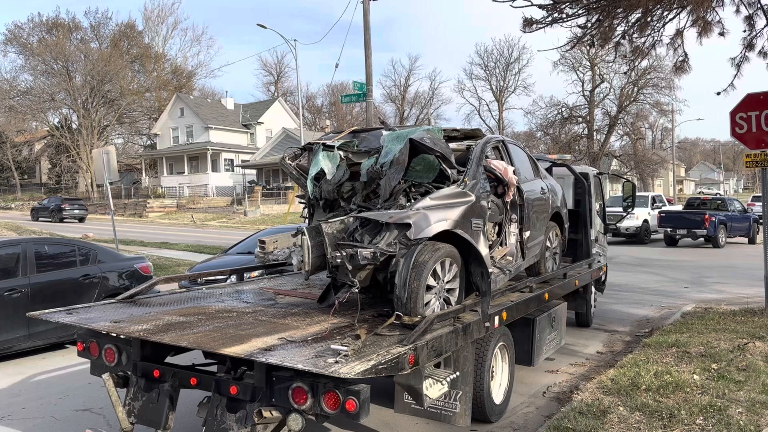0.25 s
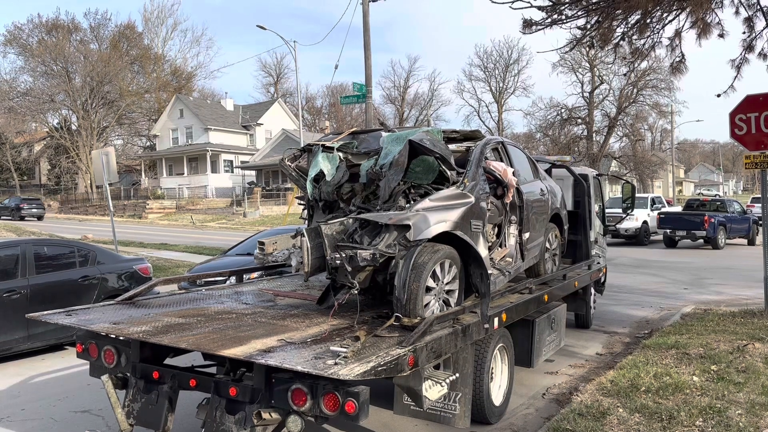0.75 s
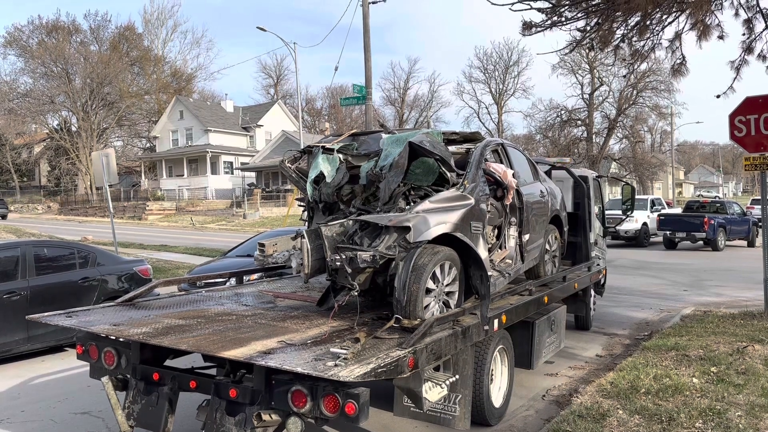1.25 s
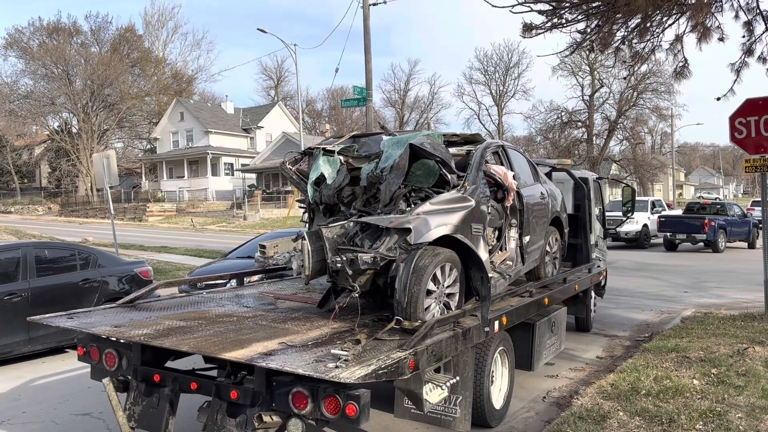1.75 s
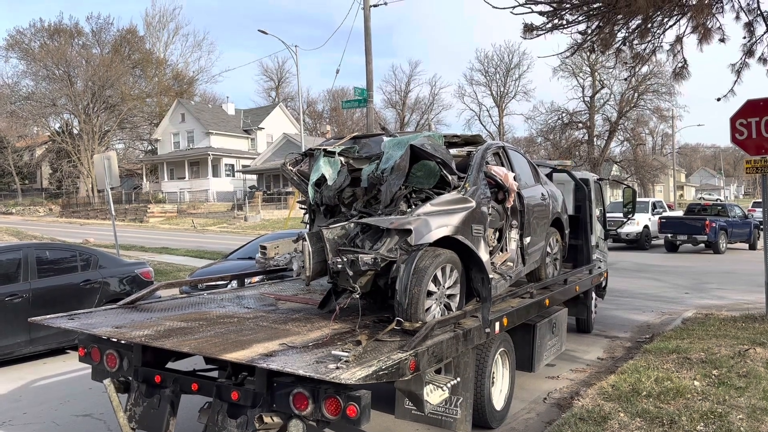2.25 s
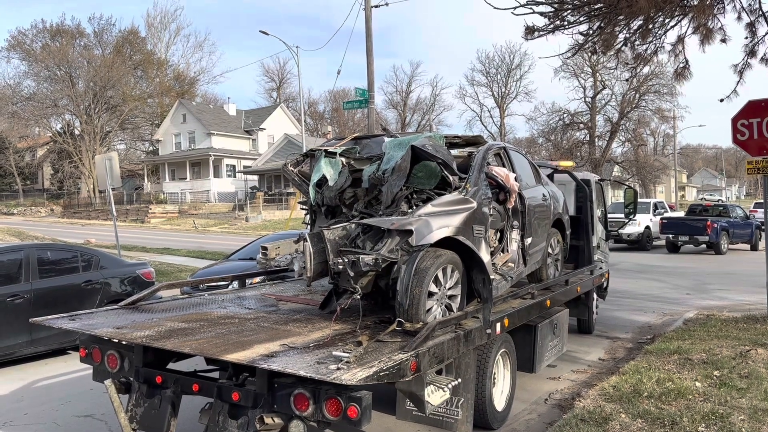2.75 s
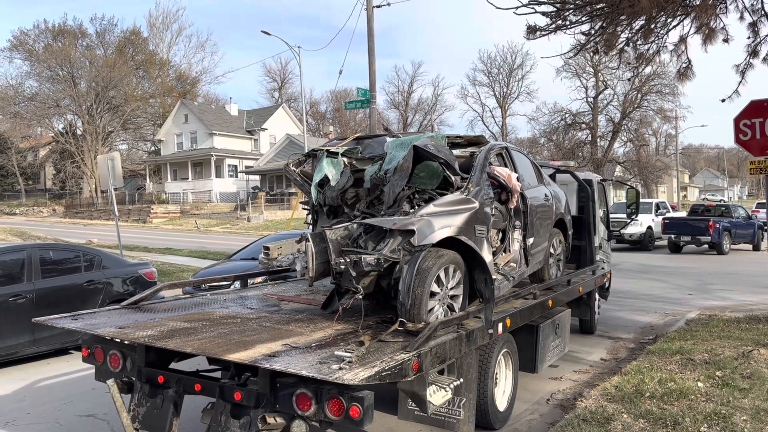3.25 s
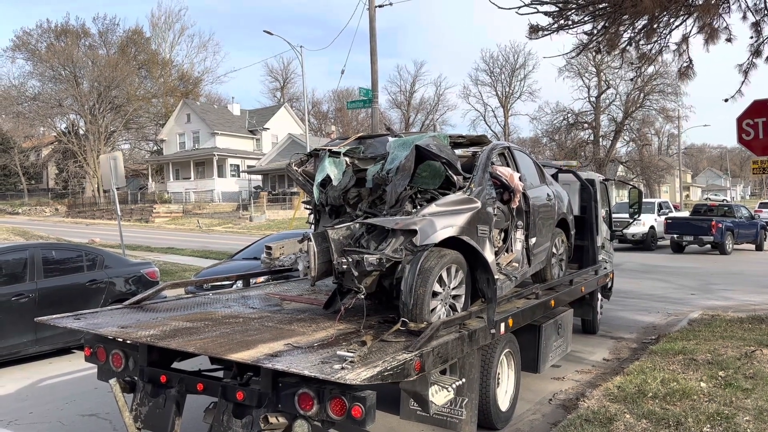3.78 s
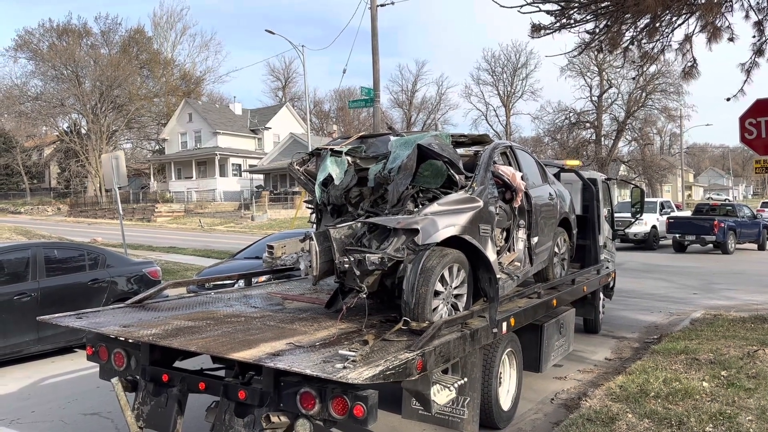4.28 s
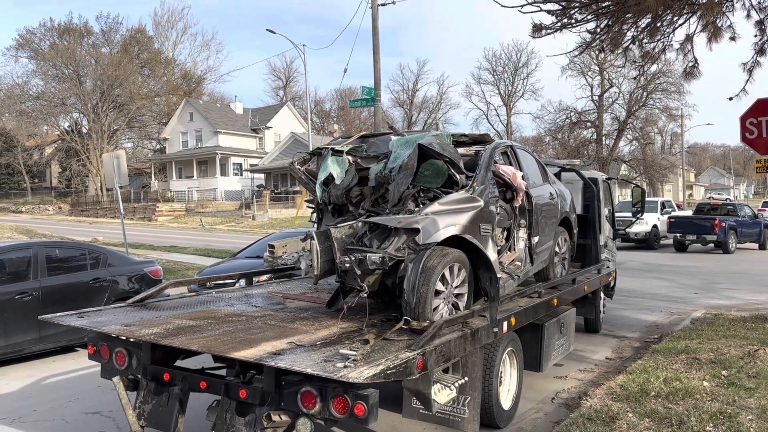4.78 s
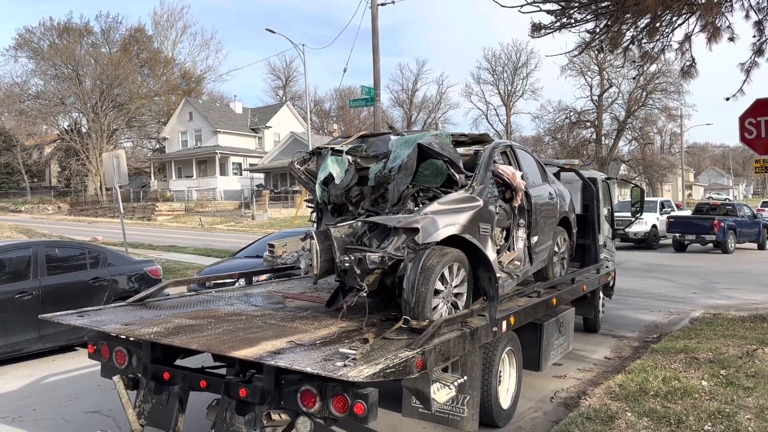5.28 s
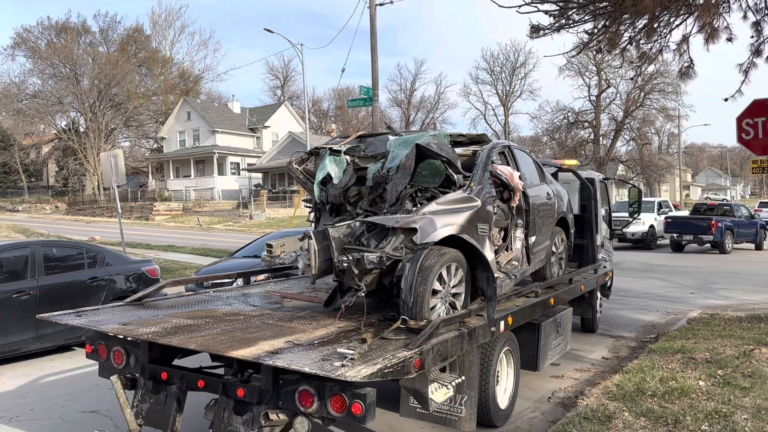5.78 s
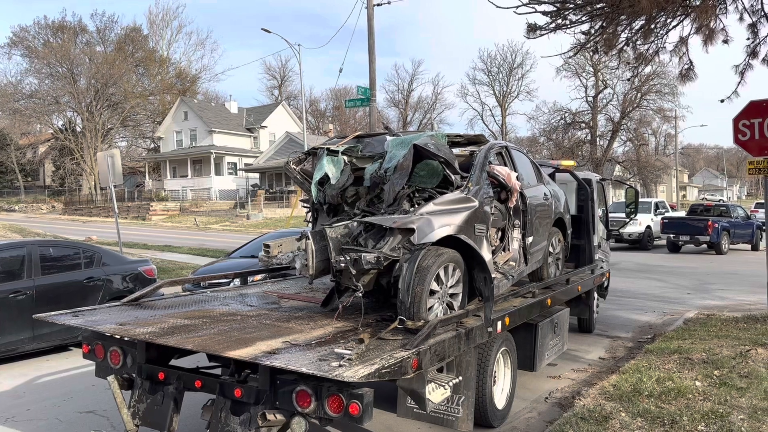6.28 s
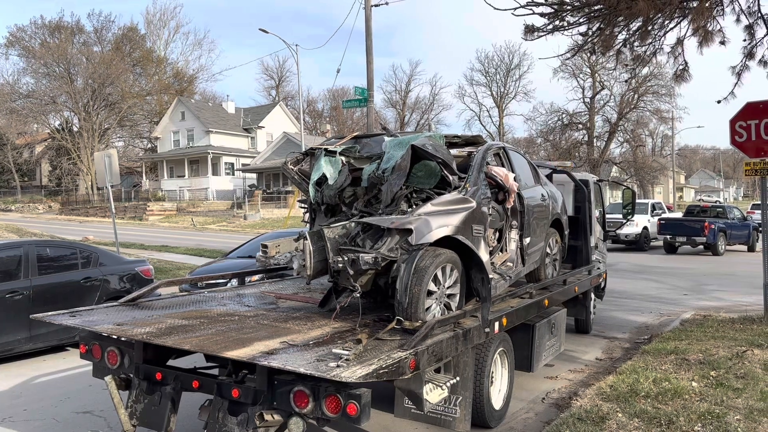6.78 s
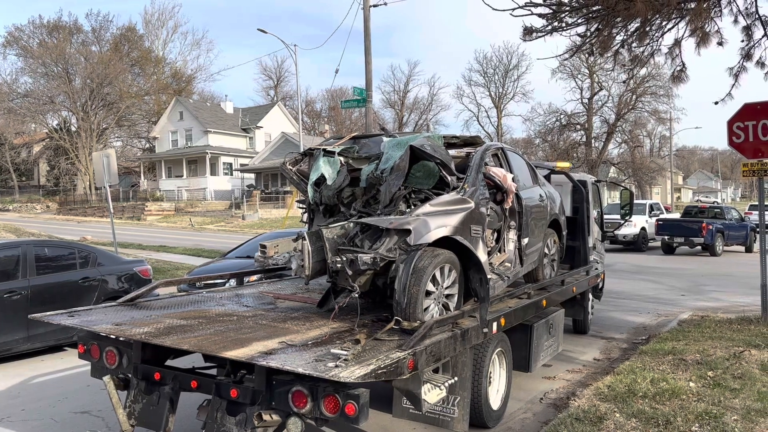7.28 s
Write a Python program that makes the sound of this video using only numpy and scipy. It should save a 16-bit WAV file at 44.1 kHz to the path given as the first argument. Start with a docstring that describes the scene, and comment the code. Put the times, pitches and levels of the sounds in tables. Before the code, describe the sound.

A diesel engine chatters evenly at fast idle, one beat in its cycle stronger, beneath a hydraulic pump's drone and whirring, hissing accessories. The stereo outdoor microphone catches strong wind: irregular low thuds, short flapping snaps and rumbling bursts, heaviest from about one and a half to five seconds, then sparser with a last strong burst after seven.

```python
"""Diesel engine and pump in gusty wind

An eight-cylinder diesel at a fast idle across the street knocks in a fixed pattern: clicks set its block ringing.
It turns a hydraulic pump; sine tones make the pump's hum and the exhaust beat.
A belt-driven accessory whirs with partly repeating noise and thin tones, and the fan is a flickering hiss.
Wind rumbles as shaped noise and thumps the microphone with short sliding swings.
A metal tick and two faint high chips are also heard."""
import sys
import numpy as np
from scipy import signal
from scipy.fft import rfft, irfft, next_fast_len
from scipy.io import wavfile

SR = 44100
rng = np.random.default_rng(int(sys.argv[2]) if len(sys.argv) > 2 else 0)


def inscribe(sig):
    """Save sig as 16-bit PCM at rate SR to the path in sys.argv[1].

    A 1-D sig is mono; a 2-D sig holds one channel per row.
    Samples are clipped to [-1, 1] before scaling.
    """
    pcm = np.round(np.clip(np.atleast_2d(sig).T, -1, 1) * 32767)
    wavfile.write(sys.argv[1], SR, pcm.astype(np.int16))


N = 332066
CYCLE_HZ = 10.826   # full engine cycles per second; each cylinder fires once a cycle

# how alike the left and right hiss are: pitch_hz, likeness (0 to 1)
LIKENESS = [(60, 1), (500, 0.7), (860, .55), (1200, 0.28), (1550, 0.25), (1900, .75), (2500, 0.34),
            (3000, 0.49), (3400, .2), (4300, .68), (5300, 0.18), (6800, .4), (7500, .2), (8600, 1),
            (10000, 0.23), (13000, .6), (13700, 1)]
# which side the machine sounds lean to: pitch_hz, left_minus_right_db
LEAN = [(60, 0.5), (700, 1.5), (900, -2), (1250, -2), (1550, -10), (1900, 1), (2600, 3), (3300, 8),
        (3900, -4.5), (4600, 2.5), (8000, -0.1)]
# how far the right side of the hiss is shifted ahead: pitch_hz, phase_radians
RIGHT_LEAD = [(700, 0), (950, -0.8), (1150, 1.7), (1460, 1.57), (1800, -0.24), (2400, -0.4), (2900, -1.3),
              (3350, -1.9), (3700, 1.2), (4100, -0.1), (5300, -.5), (5900, -1.5), (7400, -2.5), (8400, 1.5),
              (9000, 1.9), (10000, 0), (12000, -9.5), (13600, -2.5)]


def from_db(db):
    """Turns decibels into a plain gain."""
    return 10 ** (np.asarray(db) / 20)


def rms_one(x):
    """Scales a sound to an rms of 1."""
    return x / np.sqrt(np.mean(x ** 2) + 1e-20)


def in_time(rows):
    """Draws straight lines between timed rows, giving each column a value at every sample."""
    s, *columns = np.transpose(rows)
    return [np.interp(np.arange(N) / SR, s, c) for c in columns]


def at_hz(points, hz):
    """Reads a curve at any pitch, with pitch on a log axis."""
    points = np.array(points, float)
    return np.interp(np.log(hz), np.log(points[:, 0] + 1), points[:, 1])


def drift(rate):
    """Smoothed noise that wanders slowly around 0 with spread 1; a higher rate wanders faster."""
    r = np.exp(-80 * np.pi * rate / SR)   # one value every 40 samples
    steps = rng.standard_normal(N // 40 + 2002)
    slow = signal.lfilter([1], [1, -2 * r, r * r], steps)[2000:]   # drop the settling-in
    return np.interp(np.arange(N) / 40, np.arange(len(slow)), rms_one(slow))


def ring(clicks, hz, t60):
    """A resonator: each unit click starts a sine that dies away by 60 dB in t60 seconds."""
    r, w = from_db(-60 / (t60 * SR)), 2 * np.pi * hz / SR
    return signal.lfilter([0, np.sin(w)], [1, -2 * r * np.cos(w), r * r], clicks + 1e-18)


def panned(x, pan_db):
    """Makes two channels, the left louder than the right by pan_db."""
    return np.array([x * from_db(pan_db / 2), x * from_db(-pan_db / 2)])


def stereo_noise(spectrum, likeness, lean, loop_hz=1, memory=0, lead=((1, 0), (2, 0))):
    """Noise of rms 1 shaped by the curves; with memory it partly repeats itself loop_hz times a second."""
    size = next_fast_len(N)
    hz = np.arange(size // 2 + 1) * SR / size + 1
    mid, side = rfft(rng.standard_normal((2, size)))
    alike = np.clip(at_hz(likeness, hz), 0, .98)
    # the shared part is the same on both sides, the other part has opposite signs
    pair = np.sqrt(1 + alike) * mid + np.sqrt(1 - alike) * side * [[1], [-1]]
    pair[1] *= np.exp(1j * at_hz(lead, hz))
    pair /= 1 - min(memory, .95) * np.exp(-2j * np.pi * hz / loop_hz)   # each turn keeps a share of the last
    colour = panned(from_db(at_hz(spectrum, hz)), at_hz(lean, hz))
    return rms_one(irfft(pair * colour, size)[:, :N])


def add_swing(out, s, level_db, hz, pan_db, rise, fall, glide, hold_s=0):
    """Adds a pressure swing that swells to a crest at s and fades, sliding down in pitch through hz at the crest."""
    hold = hold_s * hz   # rise, hold and fall all count in cycles of hz
    lead_in = int(3 * rise * SR / hz)
    cycles = np.arange(-lead_in, int((hold + 6 * fall) * SR / hz)) * hz / SR
    swell = np.exp(-(cycles / rise) ** 2)
    fade = np.exp(-np.maximum(cycles - hold, 0) / fall)
    shape = np.where(cycles < 0, swell, fade)
    pitch_ratio = np.where(cycles < 0, 1 - glide * cycles, 1 / (1 + glide * np.abs(cycles)))
    turns = np.cumsum(pitch_ratio) * hz / SR
    start = round(s * SR) - lead_in
    wave = from_db(level_db) * shape * np.sin(2 * np.pi * (turns + rng.random()))
    out[:, start:start + len(cycles)] += panned(wave, pan_db)


def knock(wander_s, scatter_db):
    """Each firing clicks every mode of the block; one cylinder is louder and makes a soft chug. Timing wanders."""
    # knock of each cylinder in firing order: left_db, right_db (full strength only at the chug pitch)
    cylinder_levels = [(-3, -7), (-7, -3), (-5, -6), (3, 3.5), (-6, -7), (-3, -4), (-8, -8), (-4, -4)]
    # ringing modes of the engine block: pitch_hz, t60_s, left_db, right_db, right_lag_s (before random spread)
    block_modes = [(744.4, 0.11, -40, -39, 0), (780, 0.071, -48.5, -49.5, 0), (868, 0.15, -40, -41, 0),
                   (894, 0.14, -43.5, -43, 0), (951, 0.069, -43, -48.5, 0), (989, .13, -38.5, -40, 0.0046),
                   (1004, 0.069, -40, -41, -.00005), (1118, 0.12, -43.5, -39.5, -0.000041),
                   (1140, 0.073, -45.5, -38, -0.00058), (1210, 0.13, -42.5, -42, -.00017),
                   (1300, 0.073, -45, -42.5, -.00018), (1440, 0.057, -44.5, -44.5, -.00018),
                   (1510, 0.044, -45, -43.5, 0.0076), (1558, .06, -48.5, -42, -.00012),
                   (1600, 0.076, -49, -48, -.00007), (1880, 0.082, -46, -46.5, .00001),
                   (2273, 0.035, -48.5, -47.5, .00004), (2400, 0.027, -46, -51, .00003),
                   (2540, .025, -48.5, -51.5, -0.0069)]
    chug_hz, chug_octaves = 1050, .6   # the cylinders differ most around this pitch
    ear_path_spread_s = 0.00011   # each cylinder reaches the two sides by slightly different paths

    firing = np.arange(int((N / SR - .01) * 8 * CYCLE_HZ))
    at = np.round(firing / (8 * CYCLE_HZ) * SR).astype(int)
    at = at + np.round(wander_s * SR * drift(1.5)[at]).astype(int)
    cylinder = firing % 8
    out = np.zeros((2, N))
    for hz, t60, left_db, right_db, lag_s in block_modes:
        contrast = np.exp(-(np.log2(hz / chug_hz) / chug_octaves) ** 2)
        level_db = contrast * np.array(cylinder_levels)[cylinder] + [left_db, right_db]
        level_db = level_db + rng.normal(0, scatter_db, (len(at), 1))
        left, right = from_db(level_db).T
        # paths through block and bodywork differ in length, which smears each knock
        left_at = at + (rng.uniform(-.0008, .0012, 8) * SR).astype(int)[cylinder]
        lag_s = lag_s + rng.normal(0, ear_path_spread_s, 8)[cylinder]
        right_at = left_at + np.round(lag_s * SR).astype(int)
        clicks = np.zeros((2, N))
        clicks[0, np.clip(left_at, 0, N - 1)] = left
        clicks[1, np.clip(right_at, 0, N - 1)] = right
        out += ring(clicks, hz, t60)
    # the block radiates no bass and little treble
    return signal.sosfilt(signal.butter(2, [680, 3000], "band", fs=SR, output="sos"), out)


def hums():
    """The pump teeth and the exhaust beat each make a row of sines at whole multiples of their rate."""
    # pump tones: multiple of the tooth rate, relative_db
    pump_tones = [(1, -5.5), (2, -1), (3, -20.5)]
    # exhaust tones: multiple of the cycle rate, relative_db
    exhaust_tones = [(4, -3), (8, -9), (12, -13), (16, -14.5), (24, -14.5), (28, -9)]
    # pump loudness before its slow waver: time_s, level_db
    pump_level = [(0, -33.5), (1.75, -32), (2.0, -38.5), (3.2, -39), (3.8, -33), (4.4, -36.5), (5.2, -34.5),
                  (7.53, -34.5)]
    # loudness of the lower exhaust tones: time_s, level_db
    throb_level = [(0, -31), (1.9, -34), (2.5, -43), (4.2, -47), (5.0, -50), (7.53, -51)]
    tooth_hz, pump_waver_db = 292.7, 0.96
    side_waver_db = 1.0   # all pump tones but the second also swell and fade on their own
    buzz_from, buzz_db = 20, -37   # exhaust multiples from this one up hold a steady level

    (pump_db,), (throb_db,) = in_time(pump_level), in_time(throb_level)
    teeth, cycle = 2 * np.pi * np.outer([tooth_hz, CYCLE_HZ], np.arange(N) / SR)
    teeth = teeth + .08 * drift(2.5)   # the pump's pitch is slightly unsteady
    pump, throb = np.zeros(N), np.zeros(N)
    for k, db in pump_tones:
        tone_db = db + (k != 2) * side_waver_db * drift(3.4)
        pump += from_db(tone_db) * np.sin(k * teeth + rng.uniform(0, 2 * np.pi))
    for k, db in exhaust_tones:
        tone_db = db + (throb_db if k < buzz_from else buzz_db)
        throb += from_db(tone_db) * np.sin(k * cycle + rng.uniform(0, 2 * np.pi))
    pump_db = pump_db + pump_waver_db * drift(4.1)
    return np.sqrt(2) * (panned(from_db(pump_db) * pump, -1.5) + panned(throb, .3))


def accessory():
    """A belt-driven unit: a rush that partly repeats every turn, and thin tones that swell and fade."""
    # colour of the rush: pitch_hz, relative_db_per_hz
    whir_colour = [(600, -22.5), (850, -2.5), (1100, -10.5), (1420, 18), (1700, 4.5), (1910, 15.5),
                   (2100, 4), (2300, 11), (2650, 0.5), (2820, 5.5), (3080, -8), (3250, -7), (3600, -3),
                   (3850, -11), (4250, 5.5), (4400, -8), (5000, -23), (7000, -122)]
    # thin tones: pitch_hz, level_db (rms, before swelling and leaning)
    whines = [(1257, -54.5), (1301, -61.5), (1344, -61.5), (1386, -57.5), (1427, -59), (1552, -58.5),
              (1635, -57), (1847, -64), (1889, -58.5), (1931, -58), (2141, -65), (2184, -63.5), (2266, -58),
              (2309, -63), (2428, -57), (2548, -65), (2769, -60), (2939, -58), (3205, -72.5), (3660, -65.5),
              (4290, -66.5)]
    turn_hz, memory, whir_db = 42.0, 0.42, -42.5   # memory: share kept from the last turn

    rush = stereo_noise(whir_colour, LIKENESS, LEAN, turn_hz, memory, lead=RIGHT_LEAD)
    out = from_db(whir_db) * rush
    for hz, level_db in whines:
        phase = 2 * np.pi * hz * np.arange(N) / SR + 0.00061 * hz * drift(2.5)
        tone = np.sqrt(2) * from_db(level_db + 2.5 * drift(6.0)) * np.sin(phase)
        out += panned(tone, at_hz(LEAN, hz))
    return out


def fan():
    """Moving air makes a noise hiss whose upper bands flutter on their own."""
    # colour of the hiss: pitch_hz, relative_db_per_hz
    hiss_colour = [(20, -5), (50, 0), (230, -5), (300, -6), (450, -9), (800, -9), (1500, -14),
                   (2700, -15.5), (3200, -21), (4300, -23), (5500, -28.5), (9700, -38), (11200, -76.5),
                   (13300, -39), (15800, -51)]
    # fluttering bands: from_hz, to_hz, swing_db, rate (per s)
    flicker = [(1700, 3600, 1.2, 20), (3020, 5000, 0.68, 20), (5000, 8000, 0.96, 15),
               (8100, 13000, 1.3, 14), (12000, 15500, 2.5, 18)]
    hiss = from_db(-34.5) * stereo_noise(hiss_colour, LIKENESS, LEAN, lead=RIGHT_LEAD)
    for low_hz, high_hz, swing_db, rate in flicker:
        band_filter = signal.butter(2, [low_hz, high_hz], "band", fs=SR, output="sos")
        band = signal.sosfiltfilt(band_filter, hiss)
        hiss = hiss + (from_db(swing_db * drift(rate)) - 1) * band
    return hiss


def tick():
    """One click sets three short metal resonances ringing, softened at the very top."""
    # the metal tick: time_s, click_db, left_minus_right_db
    metal_tick = [(3.9828, -44, -11)]
    (s, click_db, pan_db), = metal_tick
    click = np.zeros(N)
    click[round(s * SR)] = from_db(click_db)
    ringing = ring(click, 8300, 0.007) + ring(click, 9500, 0.006) + from_db(9) * ring(click, 5500, .003)
    return panned(signal.sosfilt(signal.butter(6, 10500, fs=SR, output="sos"), ringing), pan_db)


def chips():
    """Brief faint high notes: steady-pitched swings that swell and fade within some milliseconds."""
    # high chips: crest_s, level_db (before panning), pitch_hz
    high_chips = [(4.886, -45, 6500), (4.903, -44, 6460)]
    out = np.zeros((2, N))
    for s, level_db, hz in high_chips:
        add_swing(out, s, level_db, hz, 3.0, rise=8.0, fall=16.0, glide=0)
    return out


def buffets(flow):
    """Wind buffets thump the microphone, others at random follow the airflow; separate sharp snaps slide down."""
    # single timed wind buffets, loud and soft: crest_s, level_db (before panning), pitch_hz (at the crest)
    timed_buffets = [(1.309, -19, 187), (1.465, -9, 188), (1.53, -10, 193), (1.641, -18, 135),
                     (1.701, -11.5, 138), (1.722, -16, 150), (1.737, -7, 118), (1.751, -4.5, 128),
                     (1.767, -10, 175), (1.8, -9, 178), (1.958, -10, 273), (2.008, -11, 239),
                     (2.077, -13, 322), (2.106, -11.5, 203), (2.268, -12, 236), (2.362, -18.5, 323),
                     (2.525, -14, 400), (2.558, -7.5, 400), (2.629, -20, 374), (2.823, -14, 297),
                     (2.918, -15, 312), (2.997, -17, 186), (3.11, -29, 159), (3.12, -10, 237),
                     (3.286, -15, 202), (3.298, -10, 300), (3.312, -14, 171), (3.334, -9, 247),
                     (3.44, -16, 164), (3.557, -16.5, 211), (3.594, -11.5, 250), (3.66, -17, 191),
                     (3.857, -24, 181), (4.086, -12, 262), (4.178, -16, 188), (4.231, -9.5, 330),
                     (4.395, -6, 315), (4.442, -13, 323), (4.491, -15, 243), (4.711, -14, 188),
                     (4.861, -16.5, 206), (4.899, -16, 192), (4.978, -12.5, 214), (5.163, -14.5, 194),
                     (5.243, -9, 223), (5.427, -17, 235), (5.865, -22, 230), (6.165, -20, 180),
                     (6.219, -14.5, 167), (6.19, -26, 380), (6.229, -15.5, 338), (6.272, -13.5, 148),
                     (6.29, -15, 357), (6.32, -15, 193), (6.343, -21, 150), (6.889, -20.5, 265),
                     (7.013, -17, 244), (7.122, -10, 173), (7.184, -3.5, 254), (7.226, -13.5, 247),
                     (7.269, -11, 236), (7.33, -38, 109)]
    # snaps, short sharp downward-sliding thumps of wind: time_s (crest 0.79 ms later),
    # level_db (before panning), pitch_hz (at the crest), hold_s
    snaps = [(1.459, -17, 400, 0.0046), (2.219, -18.5, 760, 0.0036), (2.229, -12.5, 604, 0.0039),
             (2.36, -20, 563, .001), (2.52, -17, 685, 0.0022), (2.555, -10, 720, 0.0058),
             (2.622, -15, 685, .002), (2.648, -12, 760, 0.0029), (3.099, -17.5, 490, 0.0025),
             (3.23, -16.5, 470, 0.0082), (3.318, -17, 600, 0.0016), (4.127, -6.5, 810, 0.012),
             (4.219, -17, 720, .004), (4.248, -14.5, 527, 0.0037), (4.275, -13, 386, 0.011),
             (4.38, -14.5, 520, 0.004), (4.439, -23, 480, 0.0023), (7.262, -17, 680, 0.0018)]
    random_count, random_low_hz, random_high_hz = 320, 156, 555
    random_db, random_spread_db = -0.5, 6.5   # random buffets compared with the airflow

    when, size, pitch = rng.random((random_count, 3)).T
    s = .1 + when * (N / SR - .2)
    # lower buffets follow the middle airflow, higher ones the bright airflow
    local_flow = flow[(pitch > .5).astype(int), (s * SR).astype(int)]
    level_db = 20 * np.log10(local_flow) + random_db + random_spread_db * (2 * size - 1)
    random_hz = random_low_hz * (random_high_hz / random_low_hz) ** pitch
    random_buffets = np.transpose([s, level_db, random_hz])
    out = np.zeros((2, N))
    for s, level_db, hz in [*timed_buffets, *random_buffets]:
        add_swing(out, s, level_db, hz, rng.normal(0, 2.5), rise=0.5986, fall=0.65, glide=0.22)
    for s, level_db, hz, hold_s in snaps:
        add_swing(out, s + 0.00079, level_db, hz, 4.5, rise=.42, fall=1.0, glide=0.55, hold_s=hold_s)
    return out


def wind(flow):
    """Eddies roll over the microphone in lumps; small fast ones are bright, large slow ones deep."""
    # colours of the middle, bright and deep rumble: pitch_hz, relative_db_per_hz
    middle_colour = [(20, -29.5), (70, -13), (110, 4), (170, 1), (260, -5.5), (500, -26), (1200, -52),
                     (16000, -120)]
    bright_colour = [(20, -46), (150, -17.5), (300, 13), (500, 6), (800, -8.5), (1400, -38), (16000, -81)]
    deep_colour = [(20, -19), (40, -5.5), (65, 2), (95, -0.5), (160, -38.5), (16000, -140)]
    alike, lean = [(50, 0.78), (600, 0.66)], [(50, .4), (600, 1.2)]
    lumps = from_db(0.99 * drift(15.5))
    middle = rms_one(stereo_noise(middle_colour, alike, lean) * from_db(2.2 * drift(26.0)))
    bright = rms_one(stereo_noise(bright_colour, alike, lean) * from_db(3.5 * drift(30)))
    deep = stereo_noise(deep_colour, alike, lean)
    rumble = from_db(-3.0) * flow[0] * middle + from_db(-3.0) * flow[1] * bright
    return lumps * (rumble + from_db(-4.0) * flow[2] * deep)


def airflow():
    """Wind strength as gains for middle, bright and deep rumble: a breeze plus gusts that rise, hold and fall."""
    # breeze between gusts: time_s, flow_db
    breeze = [(0, -37), (.95, -44), (1.3, -29.5), (2.4, -29), (3.0, -33.5), (4.0, -29.5), (5.2, -29),
              (5.5, -50.5), (6.1, -31), (6.7, -49), (7.0, -29), (7.53, -45)]
    # gusts: start_s, length_s, flow_db, bright_db and deep_db (both compared with flow_db)
    gusts = [(1.434, 0.043, -21.5, -23, 3.5), (1.517, 0.039, -21.5, -7, 6), (1.692, 0.11, -17, -11.5, -0.5),
             (1.937, 0.11, -22.5, -4.5, -21), (2.08, 0.084, -20, -6, -4), (2.2, 0.076, -24, 4, -16),
             (2.342, 0.044, -25, -1.5, -10), (2.526, 0.15, -24, -1.5, 0.5), (2.615, 0.077, -21.5, -0.5, -5),
             (2.877, 0.059, -23.5, -3, 3), (3.105, 0.018, -19.5, -4.5, 4), (3.26, 0.091, -21, -3, 0),
             (3.526, 0.13, -27, -4.5, 0.5), (4.01, 0.077, -26.5, -6, 1), (4.125, 0.021, -12.5, -14, -4),
             (4.224, 0.067, -17.5, -8.5, -2), (4.328, 0.16, -26, -2, -6), (4.831, 0.074, -22.5, -6, -2.5),
             (5.212, 0.024, -24, -8, 0), (5.409, 0.029, -31, -4, -1), (6.135, 0.17, -24, -4.5, -2),
             (6.256, .11, -24, -5, 1), (7.079, 0.19, -20.5, -6, -2), (7.3, .04, -38, -1, 14.5)]
    rise_s, fall_s = 0.017, 0.053   # time to gain or lose 20 dB
    t = np.arange(N) / SR
    power = from_db(in_time(breeze)[0] + np.array([[0], [-9], [0]])) ** 2   # middle, bright, deep
    for s, length, flow_db, bright_db, deep_db in gusts:
        away = np.maximum(np.maximum((s - t) / rise_s, (t - s - length) / fall_s), 0)
        near = away < 3   # ignore the gust once it is 60 dB down
        gust_db = flow_db - 20 * away[near] + np.array([[0], [bright_db], [deep_db]])
        power[:, near] += from_db(gust_db) ** 2
    return np.sqrt(power)


def scene():
    """Engine, pump, accessory and fan under the wind, with a tick and two chips."""
    flow = airflow()
    engine = knock(wander_s=0.00014, scatter_db=1.2)
    machine = engine + hums() + accessory() + fan()
    return machine + wind(flow) + buffets(flow) + tick() + chips()


def record(dry):
    """The bass rolls off, peaks are rounded, the top is cut."""
    dry = signal.sosfilt(signal.butter(3, 36, "high", fs=SR, output="sos"), dry)
    rounded = .95 * np.tanh(dry / .95)
    return signal.sosfilt(signal.cheby2(24, 60, 15960, fs=SR, output="sos"), rounded)


dry = scene()
out = record(dry)
inscribe(out)
```